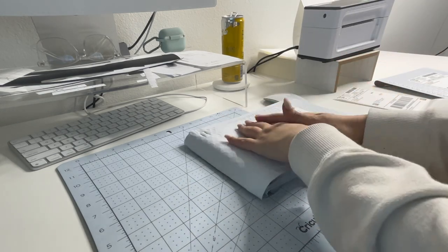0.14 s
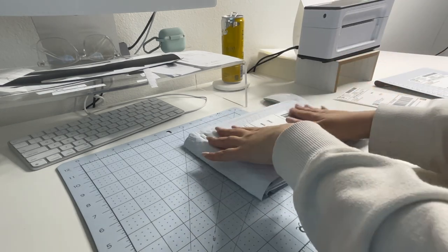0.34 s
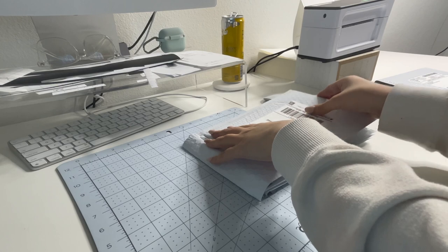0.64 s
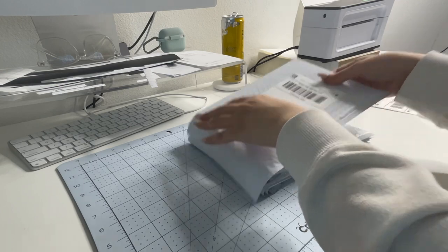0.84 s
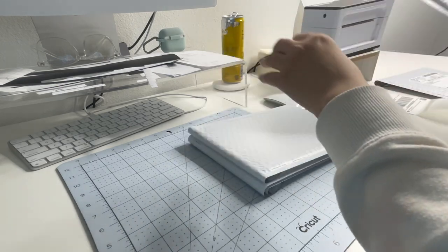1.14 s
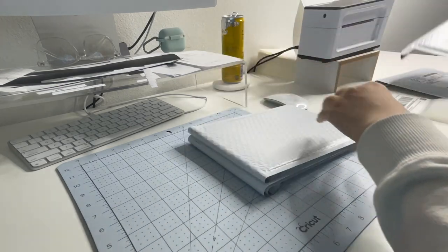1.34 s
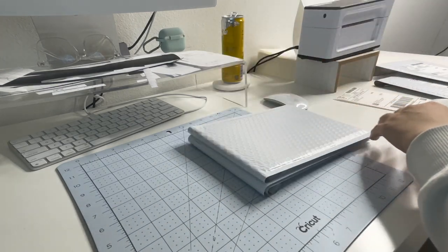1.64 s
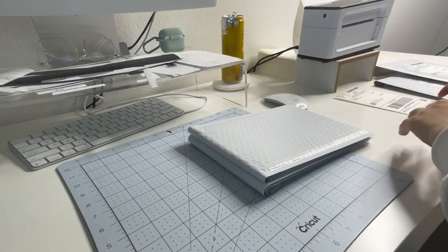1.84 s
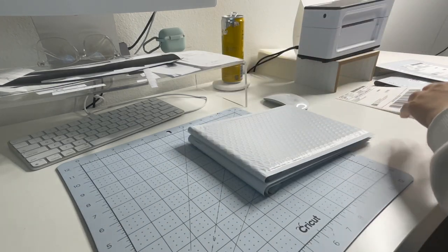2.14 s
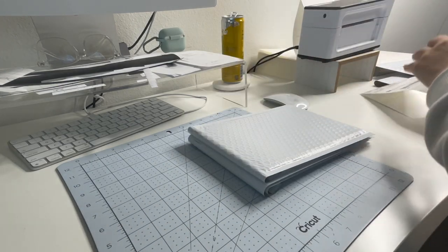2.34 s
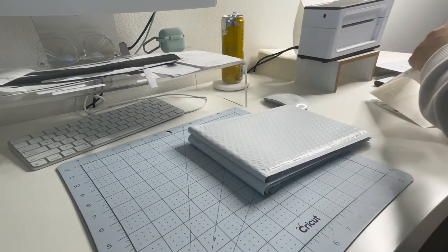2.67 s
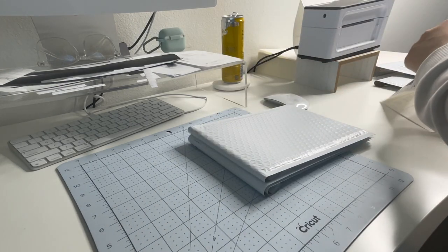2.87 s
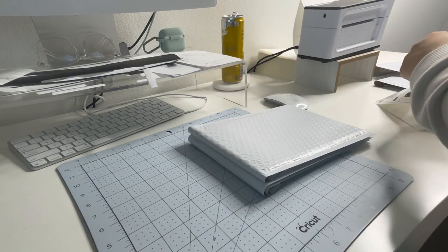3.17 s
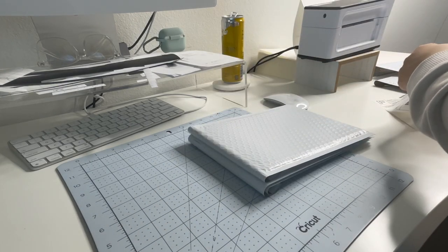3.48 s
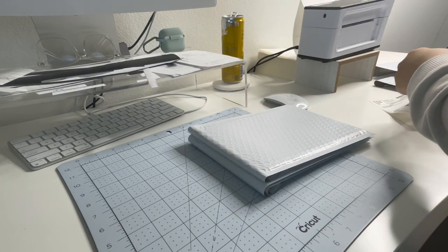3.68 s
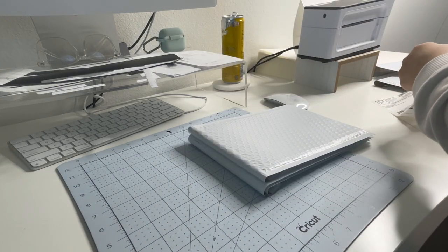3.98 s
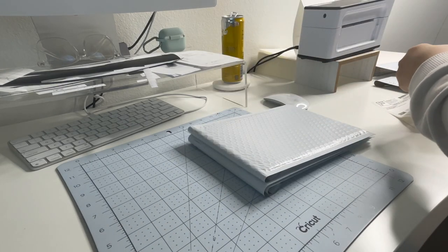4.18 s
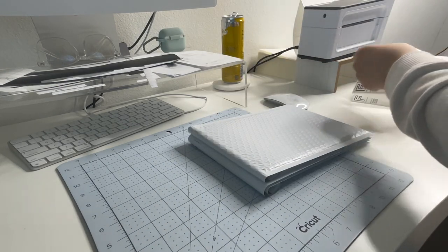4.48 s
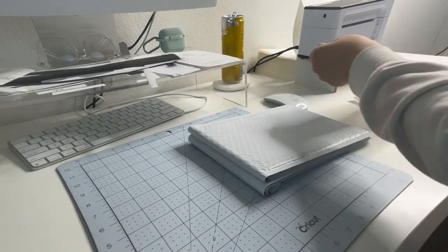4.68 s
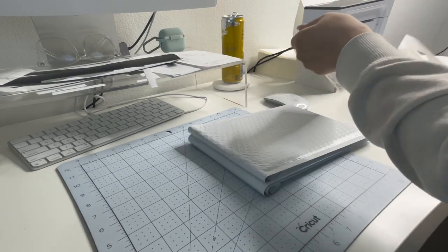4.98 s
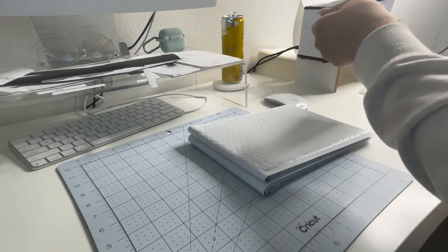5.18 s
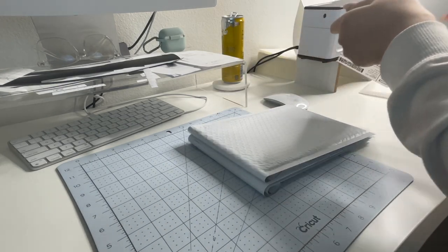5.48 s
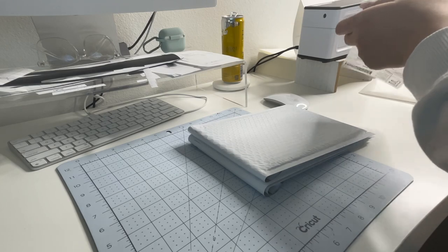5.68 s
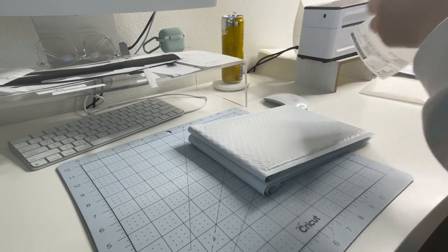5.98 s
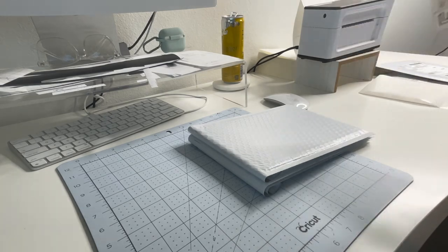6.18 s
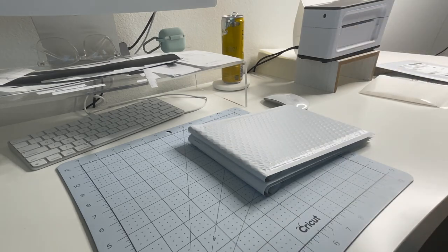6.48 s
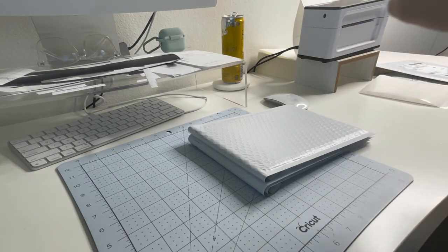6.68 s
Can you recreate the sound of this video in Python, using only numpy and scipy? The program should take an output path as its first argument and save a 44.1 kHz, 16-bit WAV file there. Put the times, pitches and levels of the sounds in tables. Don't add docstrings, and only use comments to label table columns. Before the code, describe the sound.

Close stereo microphones in a small quiet room catch hands pressing a padded plastic envelope, very faintly at first. Light slides and creases follow, then lifting and a loud shake of crisp snaps and papery rustle. Sparse folding clicks come next, then a dense run of bright peeling crackles, and finally softer scattered flexing with low pats on the desk.

```python
import sys
import numpy as np
from scipy import signal
from scipy.fft import rfft, irfft, next_fast_len
from scipy.io import wavfile

SR = 44100
rng = np.random.default_rng(int(sys.argv[2]) if len(sys.argv) > 2 else 0)


def boost(x):
    u = np.asarray(x, float) / 20
    return 10 ** u


def wrap_up_sound(samples):
    columns = np.atleast_2d(samples).T
    tamed = np.clip(columns, -1, 1)
    steps = np.round(tamed * 32767).astype(np.int16)
    wavfile.write(sys.argv[1], SR, steps)


N = 300762


def at_hz(points, hz):
    points = np.array(points, float)
    return np.interp(np.log(hz + 1), np.log(points[:, 0] + 1), points[:, 1])


def rms_one(x):
    return x / np.sqrt(np.mean(x ** 2) + 1e-20)


def peak_one(x):
    return x / np.max(np.abs(x))


def band(x, low_hz, high_hz, order=2):
    sos = signal.butter(order, [low_hz, high_hz], "band", fs=SR, output="sos")
    return signal.sosfilt(sos, x)


def resonate(x, hz, width_hz):
    r = np.exp(-np.pi * width_hz / SR)
    feedback = [1, -2 * r * np.cos(2 * np.pi * hz / SR), r * r]
    return signal.lfilter(np.array([1, 0, -1]) * (1 - r * r) / 2, feedback, x)


def drift(rate_hz):
    knots = rng.standard_normal(800)
    return np.interp(np.arange(N) / SR * rate_hz, np.arange(800), knots)


def grains(shape, spread_db):
    size_db = spread_db * np.minimum(rng.exponential(1, shape), 6)
    return rng.standard_normal(shape) * boost(size_db)


def stroke_power(rows, rise, fall):
    t = np.arange(0, N + 40, 40) / SR
    power = 0
    for s, hold, db in rows:
        below_db = np.maximum(0, np.maximum(rise * (s - t), fall * (t - s - hold)))
        power = power + boost(2 * (db - below_db))
    return np.interp(np.arange(N) / SR, t, power)


def creases():
    # (time [s], peak [dB], sheet resonance [Hz], sizzle [dB re peak],
    # crunch [dB re peak])
    press = [
        (0.021, -52, 1000, -11, -1),
        (0.039, -47.5, 880, -16, -12),
        (0.113, -51, 980, -6, -16),
        (0.147, -49.5, 1040, 0, -14),
        (0.189, -46, 1080, -3, -11),
        (0.214, -47, 990, -3, -1),
        (0.272, -60, 960, 6.5, -4),
    ]
    slide = [(0.563, -45, 5470, -11, -10), (0.6235, -34, 4860, -35, -15), (0.7091, -39, 1720, -14, -18),
             (0.7496, -48, 1710, 6.5, 13), (0.7896, -39, 1210, -5, -29), (0.8728, -51, 2200, -20, -6),
             (0.8998, -50.5, 1670, -6, -13), (0.9344, -52, 2260, -4, -1), (1.3256, -49, 4500, -7, -10),
             (1.3603, -61, 1640, -13, -7), (1.4127, -48.5, 2100, -6, 3)]
    # (time [s], peak [dB], sheet resonance [Hz], sizzle [dB re peak], crunch [dB re peak])
    lift = [(1.6423, -47.5, 3540, -21, 3), (1.6894, -33, 3300, -5.5, -0.5), (1.7125, -33, 3440, -8, 26),
            (1.7759, -32.5, 5820, 0.5, 6.5), (1.7967, -38, 5710, 0, 19), (1.9736, -45.5, 3680, -18, -9.5),
            (2.0053, -36, 2710, -5, -10), (2.0694, -20, 3050, -8, -2), (2.0759, -28.5, 2970, -40, -4.5),
            (2.0822, -23, 3610, -35, -9.5), (2.143, -42.5, 6130, 2, -9.5), (2.2242, -37.5, 2330, 1, -1.5),
            (2.3301, -49.5, 1450, -22, -3.5), (2.3823, -37, 4170, -11, -8)]
    # (time [s], peak [dB], sheet resonance [Hz], sizzle [dB re peak], crunch [dB re peak])
    shake = [(2.4525, -18, 6050, -5.5, -0.5), (2.4625, -21, 6200, -18, 13.5),
             (2.4748, -10.5, 5080, -8, -6.5), (2.553, -23.5, 3040, -13, -7.5),
             (2.5878, -28, 6340, 0.5, -11), (2.6203, -30.5, 2500, -14.5, -1), (2.6342, -34, 1440, -11, -7),
             (2.6455, -36, 4030, -10, -12), (2.6681, -25.5, 3710, -3.5, -18),
             (2.7522, -27.5, 3060, -13, -8), (2.783, -39, 6700, -22, -12), (2.8392, -26, 4120, -6, -16),
             (2.9451, -34, 2900, -13, 3), (2.9549, -24, 3470, -40, -6.5), (2.9622, -18, 2900, -3.5, -1.5)]
    # (time [s], peak [dB], sheet resonance [Hz], sizzle [dB re peak], crunch [dB re peak])
    fold = [(3.1707, -34, 2000, -17, -17), (3.2767, -47, 6740, -8, -9), (3.2922, -47, 6720, -33, 9),
            (3.3207, -17, 2700, -8, -23), (3.341, -57, 1490, -11, -17), (3.4509, -37.5, 3280, -5.5, -4),
            (3.4746, -29.5, 3260, -6.5, -7), (3.6847, -38, 6800, -15.5, -3), (3.764, -51, 1460, -7, -8),
            (3.905, -40.5, 3200, -16, 16), (3.9291, -35, 3350, -7.5, -10), (4.0482, -39.5, 6900, -40, -6.5)]
    # (time [s], peak [dB], sheet resonance [Hz], sizzle [dB re peak], crunch [dB re peak])
    peel = [(4.15, -47, 1970, -19, -15), (4.1736, -25, 6500, -15, -33), (4.225, -28, 2480, -20, -27),
            (4.2405, -34, 3000, -12, -4), (4.283, -25.5, 3900, -6, -18), (4.2879, -27, 6560, -5.5, -13),
            (4.3191, -24, 3200, -15, -10), (4.366, -29.5, 3630, -14, -8), (4.4578, -24.5, 4350, -9, -9),
            (4.4685, -23, 3720, -6, -11.5), (4.525, -30, 2400, -7.5, -22), (4.6377, -21.5, 4200, -9, -18.5),
            (4.6425, -23.5, 3730, -18, -13.5), (4.6712, -21.5, 5500, -8, -15),
            (4.7045, -13, 4550, -12, -13), (4.7127, -30, 2210, -8, 1.5), (4.7488, -16, 3640, -10, -12),
            (4.7625, -24, 4300, -16, -12), (5.129, -42, 3910, -20, -6)]
    # (time [s], peak [dB], sheet resonance [Hz], sizzle [dB re peak], crunch [dB re peak])
    flex = [(5.5477, -28, 3400, -17, -7.5), (5.6142, -32, 3170, -15, -3), (5.6275, -38, 1790, -19, -1),
            (5.672, -36.5, 2210, -18.5, -12), (5.8018, -39.5, 3370, -8, -15), (5.895, -35, 4550, -8.5, 1),
            (5.9054, -36, 2140, -24, -12), (5.9998, -33.5, 2440, -18, -8.5), (6.1, -42, 2500, -24, -1),
            (6.3155, -37.5, 3070, -16, -4), (6.3243, -30, 2830, -21, -6.5),
            (6.3757, -26.5, 3270, -18.5, -12), (6.6133, -51.5, 3470, -9, -7), (6.6277, -33.5, 2670, -18, 5),
            (6.6419, -25, 2300, -16.5, -9.5), (6.78, -54, 3400, -13, -7), (6.8025, -38, 3000, -24, -4.5)]
    # (creases, thud [dB re peak], reach of the sound around the sheet resonance [ratio])
    gestures = [(press, 0.66, 1.6), (slide, -23, 2.2), (lift, -19, 2.03), (shake, -26, 2.7),
                (fold, -16, 2.13), (peel, -23.5, 2.16), (flex, -16, 1.68)]
    return [(s, db, hz, thud_db, sizzle_db, crunch_db, reach)
            for rows, thud_db, reach in gestures
            for s, db, hz, sizzle_db, crunch_db in rows]


def snaps(spread_db=3.5, crack_s=0.002, swell_s=0.0031, crunch_s=0.013, ring_db=3, q=3.1):
    out, t, rows = np.zeros((3, N + 4000)), np.arange(4000) / SR, creases()
    slips = grains((len(rows), 4000), spread_db)
    crunch = np.exp(-(t / crunch_s) ** 1.7) * (1 - np.exp(-t / swell_s))
    for k, (row, slip) in enumerate(zip(rows, slips)):
        s, db, hz, thud_db, sizzle_db, crunch_db, reach = row
        sharp = boost(-0.6 * (crunch_db + 9.5))
        fringe_s = crack_s * np.clip(boost(0.2 * (crunch_db + 4)), .4, 1)
        fringe = np.maximum(1 + (t - crack_s) / fringe_s, 0)
        crack = (fringe * np.exp(1 - fringe)) ** 2
        force = 0.28 * sharp * crack * rms_one(slip)
        force += 0.24 * boost(crunch_db) * crunch * rms_one(slip[::-1])
        force[84] += sharp * 0.68
        body = band(force, max(hz / (1.45 * reach), 700), min(reach * hz, 9000), order=3)
        sheet = peak_one(body + boost(ring_db) * resonate(force, hz, hz / q))
        thud = peak_one(band(force, 220, 1000))
        sizzle = peak_one(band(force * (.5 + crack), 6200, 16500, order=3))
        snap = sheet + boost(thud_db - 2.5) * thud + boost(sizzle_db + 8.5) * sizzle
        at = round(s * SR)
        out[k % 3, at:at + 4000] += boost(db + 4.0) * snap
    return out[:, :N]


def crackles(spread_db=4.0, edge_s=0.0037, q=3.9):
    # (time [s], length [s], rms level [dB],
    # patch resonance [Hz])
    patch_rolls = [(0.038, 0.0079, -57.5, 900), (0.117, 0.0044, -64, 1000), (0.143, 0.0085, -60, 1140),
                   (0.263, .012, -57, 890), (0.666, 0.024, -62, 925), (0.693, 0.014, -45, 1590),
                   (0.704, 0.017, -51, 2410), (0.746, 0.0085, -50, 1700), (0.754, 0.023, -53, 4540),
                   (0.763, 0.03, -61, 6100), (.790, .005, -48, 1270), (0.883, .003, -60, 4000),
                   (1.704, 0.043, -49.5, 3520), (1.761, 0.042, -45.5, 5440), (1.973, .004, -47, 3740),
                   (2.001, 0.056, -50.5, 2950), (2.089, 0.0044, -39, 4480), (2.982, 0.0072, -43.5, 1430),
                   (3.169, 0.0044, -49.5, 730), (3.342, 0.0061, -57.5, 1430), (3.474, 0.0058, -49, 1150),
                   (4.527, .008, -51, 1500), (4.747, 0.014, -35.5, 3540), (5.615, 0.022, -47, 3400),
                   (5.667, 0.012, -44, 3200), (5.672, 0.014, -44, 2080), (5.81, 0.005, -53, 2150),
                   (5.908, 0.013, -48, 4550), (5.993, 0.016, -49, 2670), (6.313, 0.023, -46, 4500),
                   (6.64, 0.012, -40, 4960), (6.641, 0.019, -50, 1100),
                   (0.948, .07, -67, 3000), (1.03, 0.089, -72, 3220), (1.11, 0.081, -72, 3500),
                   (1.403, 0.04, -59, 1230), (1.41, 0.044, -62.5, 2980), (1.468, 0.076, -60.5, 1400),
                   (1.704, 0.025, -54, 297), (1.822, .012, -51, 536), (1.833, 0.021, -54.5, 310),
                   (1.88, 0.056, -57.5, 330), (2.465, .02, -30.5, 4500), (2.484, 0.0079, -36, 1480),
                   (2.552, 0.0045, -45.5, 7900), (2.614, 0.0073, -50, 2680), (2.948, .008, -39, 3500),
                   (4.169, 0.0066, -45.5, 6500), (4.173, .006, -46, 6500), (4.316, 0.017, -43.5, 3350),
                   (4.37, 0.0043, -46.5, 3220), (4.649, 0.033, -47, 3980), (4.675, 0.016, -45.5, 3450),
                   (4.708, 0.0045, -36, 2080), (4.726, .025, -42, 3420), (5.616, 0.016, -53.5, 686),
                   (5.85, .045, -60, 4700), (5.915, .07, -58, 4700), (3.175, .015, -54, 1700),
                   (3.3215, .002, -34, 6200), (.713, .004, -47, 1750), (.215, .004, -53, 700),
                   (.19, .004, -54, 600)]
    rolls = patch_rolls
    out, t = np.zeros((3, N + 4000)), np.arange(4000) / SR
    slips = grains((len(rolls), 4000), spread_db)
    for k, ((s, length, db, hz), slip) in enumerate(zip(rolls, slips)):
        roll = np.clip(np.minimum(t, length + 2 * edge_s - t) / edge_s, 0, 1) ** 2
        patch = rms_one(resonate(resonate(slip, hz, 2 * hz / q), hz, hz / q))
        at = round((s - edge_s / 2) * SR)
        out[k % 3, at:at + 4000] += boost(db) * roll * patch
    return out[:, :N]


def rubbing_db(share=None, settle_db=0, sizzle=0):
    # (time [s], hold [s], rustle level [dB], dull share [dB], bright share [dB])
    rubs = [(0.012, 0.021, -59.5, -3, 8), (0.111, 0.22, -59.5, -5, 18), (0.414, .16, -70.5, -9, 10.5),
            (0.597, 0.11, -56.5, -4, 9), (0.685, 0.08, -56.5, -3.5, 14.5), (0.893, 0.091, -62.5, -32, 7),
            (.97, .22, -69, -8, 6), (1.21, .11, -72, -4, -8), (1.338, 0.21, -58.5, -4, 8),
            (1.687, 0.65, -55.5, -10, 11), (2.051, 0.034, -43, -12.5, 11.5), (2.145, 0.73, -56, -1.5, 5),
            (2.438, 0.15, -57.5, 7, 13), (2.745, 0.025, -51.5, -10, 12.5), (3.055, 0.2, -65.5, -3, -8),
            (3.176, 0.037, -65.5, 6, 4.5), (3.425, 1, -62.5, -2.5, 4.5), (3.885, 0.07, -72.5, 13.5, 18),
            (4.177, 0.2, -50, -5, 11.5), (4.459, 0.36, -50, -14, 11.5), (4.846, 0.13, -50, -9.5, 6.5),
            (4.996, 0.14, -56, -3, -2), (5.454, 0.11, -71, -22, 3), (5.567, 0.067, -62, 11.5, 13),
            (5.811, 0.16, -61.5, 2.5, 11.5), (6.069, 0.039, -76.5, 18.5, 5.5), (6.755, 0.083, -65.5, 4, 7)]
    rows = [(row[0], row[1], row[2] + (row[share] if share else 0)) for row in rubs]
    strokes = stroke_power(rows, rise=393, fall=205)
    rows = [(row[0], 0, row[1] - 28.5 + settle_db + sizzle * row[4]) for row in creases()]
    settling = stroke_power(rows, rise=3000, fall=60 / 0.37)
    still_db = -82
    return 10 * np.log10(strokes + settling + boost(2 * still_db))


def rustle(spread_db=3.5, clump_db=3.0, patch_db=1.7):
    level_db = rubbing_db()
    dull_db = rubbing_db(share=3, settle_db=-4) - level_db
    bright_db = rubbing_db(share=4, settle_db=17, sizzle=1) - level_db
    # (low edge [Hz], high edge [Hz], share [dB])
    parts = [(198, 697, dull_db - 0.5), (620, 2310, dull_db - 4.5), (1400, 3800, -0.7),
             (2830, 5440, 0.5), (5600, 21900, bright_db)]
    out = np.zeros((3, N))
    clumps = boost(clump_db * drift(70))
    for k, (low, high, share_db) in enumerate(parts):
        patch = rms_one(band(clumps * grains(N, spread_db), low, high, order=3))
        out[k % 3] += boost(level_db + share_db - 9.5 + patch_db * drift(30)) * patch
    return out


def pats(t60=0.049, rise_s=0.0012):
    # (time [s], peak [dB], pitch [Hz])
    blows = [(0.186, -70, 202), (1.701, -53, 277), (1.748, -47.5, 295), (1.822, -40.5, 243),
             (1.868, -51, 303), (1.907, -49.5, 305), (2.068, -37.5, 523), (2.339, -47.5, 283.4),
             (2.459, -35, 340), (2.837, -42, 553), (2.956, -33.5, 296), (3.321, -35.5, 540),
             (4.317, -44, 360), (4.465, -47, 220), (4.702, -55, 226), (5.062, -46, 274), (5.615, -41, 500),
             (5.802, -40.5, 596), (5.894, -44.5, 279), (6.327, -44, 273), (6.641, -39.5, 407)]
    out, t = np.zeros(N + 6000), np.arange(6000) / SR
    for (s, db, hz), puff in zip(blows, rng.standard_normal((len(blows), 6000))):
        blow = puff * boost(-60 * t / t60) * (1 - np.exp(-t / rise_s))
        ring = resonate(resonate(blow, hz, hz / 2.8), hz, hz / 0.7)
        out[round(s * SR):][:6000] += boost(db) * peak_one(ring)
    return out[:N]


def desk(hum_db=-60.5):
    # (frequency [Hz], width [Hz])
    modes = [(53, 22), (117, 13.5)]
    # (time [s], first mode [dB], second mode [dB])
    shoves = [(.065, -45.5, -47), (.14, -56, -44), (0.175, -62, -42.5), (.21, -60, -48), (.51, -54, -63),
              (1.1, -52, -62), (1.702, -50, -52.5), (2.11, -54, -51), (2.51, -50, -50), (3.08, -53, -67),
              (3.28, -56, -68), (3.59, -56, -75), (3.72, -55, -70), (4.05, -68, -67), (4.37, -59, -67),
              (5.301, -50.5, -69), (5.85, -52, -51.5), (6.1, -53, -65)]
    out = 0
    for k, (hz, width_hz) in enumerate(modes):
        noise = rng.standard_normal(N)
        mode = rms_one(resonate(resonate(noise, hz, width_hz), hz, 2 * width_hz))
        leans = stroke_power([(row[0], 0, row[k + 1]) for row in shoves], rise=306, fall=129)
        out = out + np.sqrt(boost(2 * hum_db) + leans) * mode
    return out


def room_echoes(onset_s=.003):
    # (frequency [Hz], T60 [s])
    room_t60 = [(200, 0.25), (1000, 0.22), (4000, 0.25), (10000, 0.074), (16000, 0.014)]
    t, out = np.arange(22050) / SR, 0
    for low in 100 * 2.0 ** np.arange(8):
        octave = band(rng.standard_normal((2, 3, len(t))), low, min(2 * low, 20000))
        out = out + octave * boost(-60 * t / at_hz(room_t60, np.sqrt(2) * low))
    out = out * (1 - np.exp(-(t / onset_s) ** 2))
    return out / np.sqrt(np.sum(out ** 2) / 6)


def room_tone(size, hz):
    # (frequency [Hz], level [dB per Hz])
    air_colour = [(15, -43.5), (25, -32), (43, -7), (64, -5), (81, -7.5), (123, -7), (169, -9.5),
                  (192, -13.5), (225, -15), (263, -19), (578, -29), (1830, -49), (13000, -60)]
    air = rfft(rng.standard_normal((2, size))) * boost(at_hz(air_colour, hz))
    return air * boost(-66) / np.std(band(irfft(air[0], size), 200, 1000))


def scene():
    # (frequency [Hz], colour [dB])
    port = [(30, -5), (310, 2), (400, 0), (1000, 6.5), (3000, -2.5), (6000, -1.5), (8500, 0), (10500, 12.5),
            (12000, -6), (13200, -20.5), (16000, -23)]
    # (frequency [Hz], left lead [rad])
    lead = [(0, 0), (1460, 3.3), (4310, 7.6), (6460, 12.9), (8610, 12.6), (9730, 9.9), (10500, 9.3),
            (11600, 6.5), (12800, 5.7), (16400, 5.5)]
    # (frequency [Hz], left minus right [dB])
    left_db = [(60, -3.5), (150, -3), (380, 1.5), (950, 2.5), (2380, 2), (5980, 4.5), (15000, 0)]
    # (frequency [Hz], likeness of the diffuse sound at the two ports [-1 to 1])
    likeness = [(60, .95), (250, .75), (600, .1), (5000, .05), (8000, .5), (9800, .95), (10600, .95),
                (12000, .65)]
    size = next_fast_len(N + 22050)
    hz = np.arange(size // 2 + 1) * SR / size
    sharp = rfft(snaps() + crackles() + pats() / 3, size)
    wide = rfft(rustle(), size)
    echoes = (boost(-8) * sharp + boost(3.5) * wide) * rfft(room_echoes(), size)
    diffuse = np.sum(echoes, axis=1) + room_tone(size, hz)
    alike = at_hz(likeness, hz)
    common = np.sqrt(1 + alike) * diffuse[0]
    apart = np.sqrt(1 - alike) * diffuse[1]
    side = np.array([[.5], [-.5]])
    colour = boost(at_hz(port, hz) + side * at_hz(left_db, hz))
    ports = colour * np.exp(1j * side * np.interp(hz, *np.transpose(lead)))
    direct = np.sum(sharp + boost(-8.5) * wide, axis=0)
    heard = irfft(ports * (direct + (common + 2 * side * apart) / np.sqrt(2)), size)[:, :N]
    return heard + desk() * boost([[-1.2], [1.2]])


def low_pass(x):
    return signal.sosfilt(signal.butter(12, 16800, fs=SR, output="sos"), x)


def record(dry):
    # (low edge [Hz], high edge [Hz], threshold [dB re mid range])
    treble_gates = [(9750, 10450, -2), (10450, 10900, -8), (10900, 11300, -11), (11300, 11900, -11),
                    (11900, 12600, -11), (12600, 13400, -14), (14400, 16000, -20)]
    turn = np.array([[1, 1], [1, -1]]) / np.sqrt(2)
    rounded = .6 * np.tanh(dry / .6)
    hz, _, frames = signal.stft(turn @ rounded, SR, nperseg=1024)
    power = np.abs(frames) ** 2
    middle = power[:, (hz > 1500) & (hz < 9000)].mean(axis=(0, 1))
    for low, high, gate_db in treble_gates:
        rows = (hz >= low) & (hz < high)
        is_open = power[:, rows].mean(axis=1) > boost(2 * gate_db) * middle
        frames[:, rows] *= is_open[:, None]
    frames[:, (hz >= 13400) & (hz < 14400) | (hz >= 16000)] *= boost(-40)
    mix = turn @ signal.istft(frames, SR, nperseg=1024)[1][:, :N]
    return low_pass(mix)


dry = scene()
out = record(dry)
wrap_up_sound(out)
```